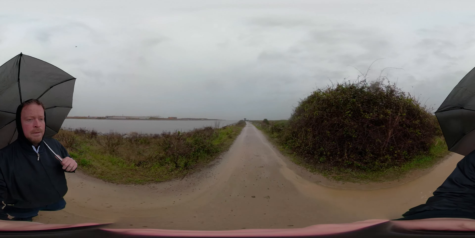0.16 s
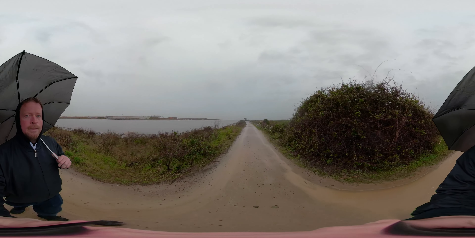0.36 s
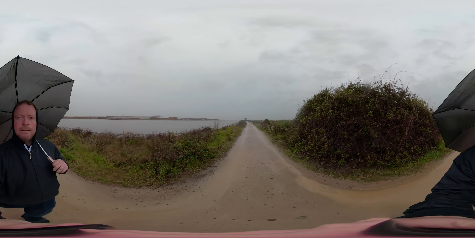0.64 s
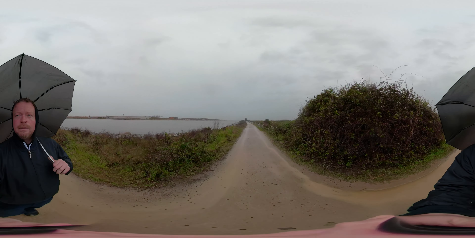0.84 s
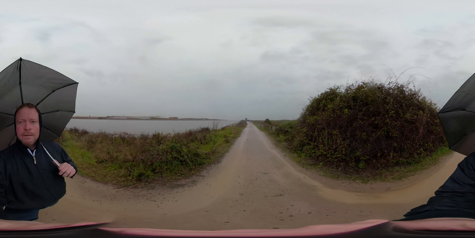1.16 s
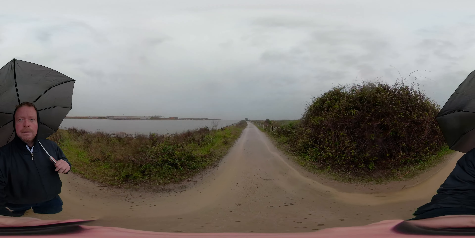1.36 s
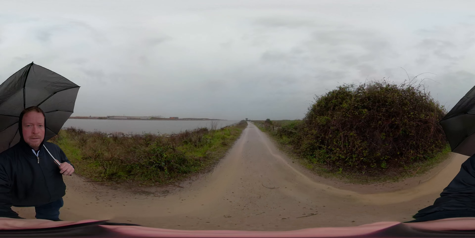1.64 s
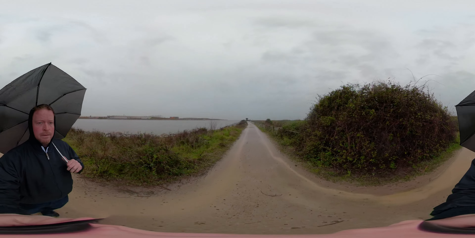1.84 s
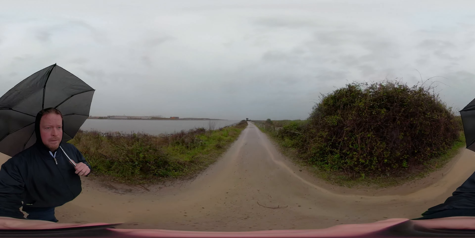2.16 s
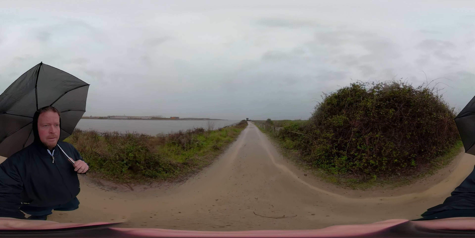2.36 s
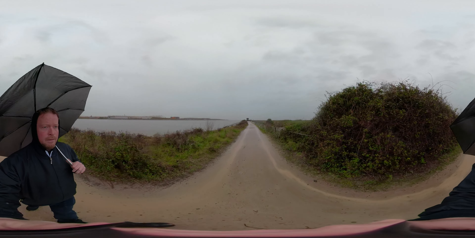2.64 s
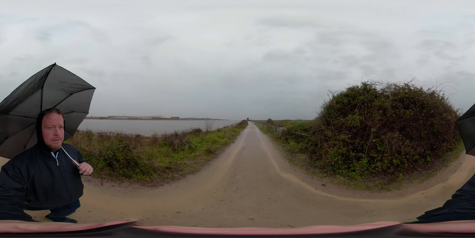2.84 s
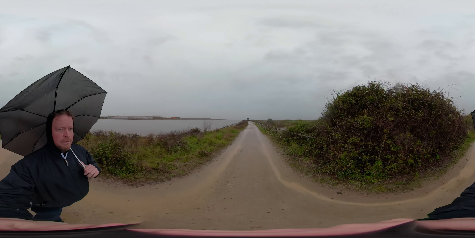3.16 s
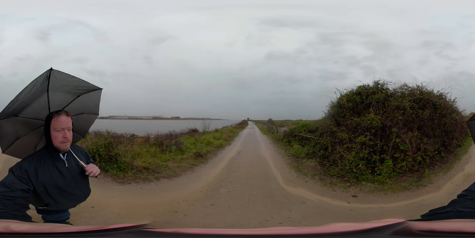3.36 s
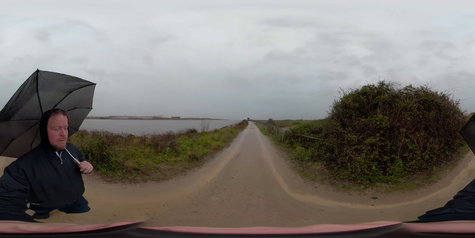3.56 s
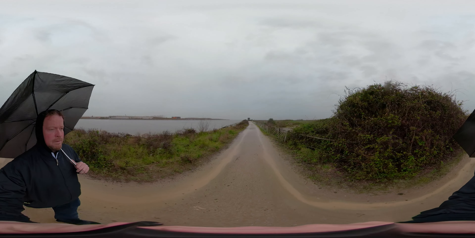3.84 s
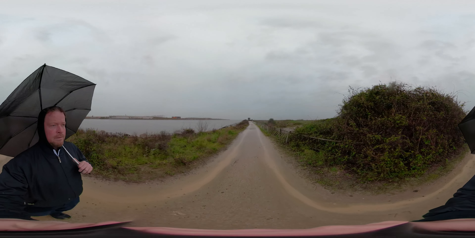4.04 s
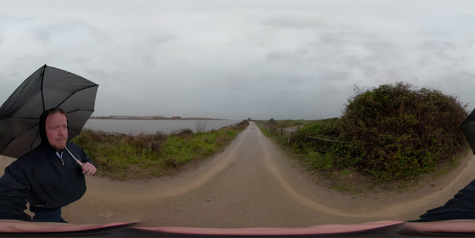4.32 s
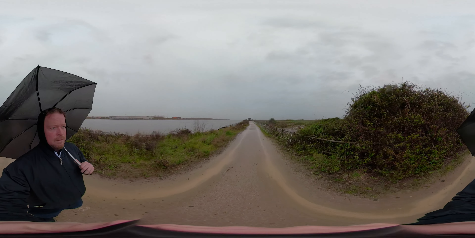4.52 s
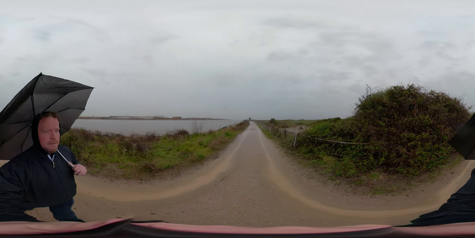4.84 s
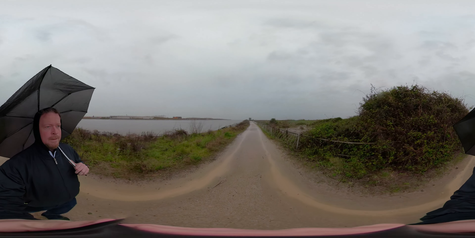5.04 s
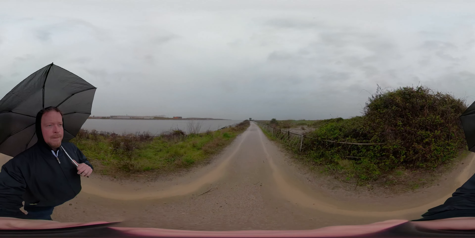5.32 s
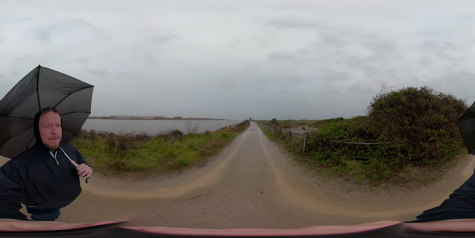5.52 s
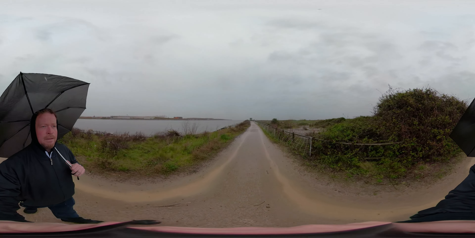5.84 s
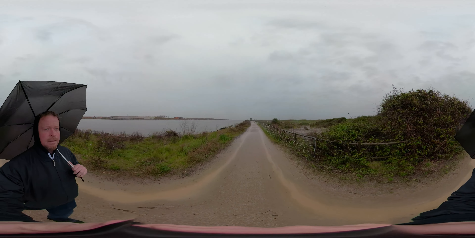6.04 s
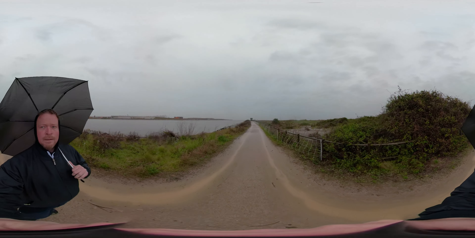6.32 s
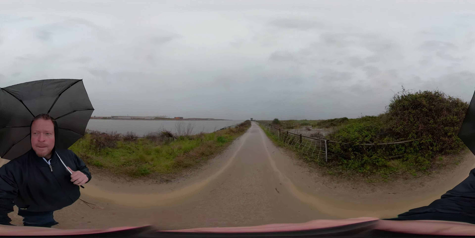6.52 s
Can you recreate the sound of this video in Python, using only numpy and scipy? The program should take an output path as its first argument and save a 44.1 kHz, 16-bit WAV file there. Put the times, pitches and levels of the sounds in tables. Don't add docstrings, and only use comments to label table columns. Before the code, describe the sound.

Open air, a small microphone close beneath an umbrella. From 0 s, dense bright ticks and patter on taut cloth sit over low, uneven wind buffeting, a soft midrange wash of rain on the ground, a hiss of distant drops and a faint fluttering engine hum. One very loud snap hits at 0.5 s with a short low cloth ring. Water laps faintly nearby until about 2.5 s. Boots scuff wet grit quietly roughly every 0.55 s. The shower eases toward 3.2 s, with a strong drop near 3.0, then hardens suddenly at 3.7 s. At 5.15-5.25 s runoff splashes in a quick cluster and a deep, short thump closes the microphone. From 5.4 s treble steadily dulls; muffled knocks and wet cloth crackle, with bursts near 6.1, 6.25, 6.4 and 6.6 s, continue to the 6.7 s end.

```python
import sys
import numpy as np
from scipy import signal
from scipy.fft import rfft, irfft
from scipy.io import wavfile
from scipy.ndimage import uniform_filter1d, minimum_filter1d

SR = 44100
rng = np.random.default_rng(int(sys.argv[2]) if len(sys.argv) > 2 else 0)


def inscribe(sig):
    pcm = np.round(np.clip(np.atleast_2d(sig).T, -1, 1) * 32767)
    wavfile.write(sys.argv[1], SR, pcm.astype(np.int16))


def nominal_scale(level):
    x = np.asarray(level, float) / 20
    return 10 ** x


N = 294588

# (time [s], level [dB])
SHOWER = [(0, 2), (.7, 1.5), (1.4, -1), (2.0, -0.5), (2.6, -3.5), (3.2, -6), (3.7, 2), (4.5, 0.9),
          (5.1, 2.5), (5.8, -2.5), (6.2, 0.8), (6.68, 1.2)]
# (time [s], share covered [0-1])
FILM = [
    (0, 0.02),
    (5.35, 0.02),
    (5.6, 0.52),
    (5.85, 0.76),
    (6.68, 0.87),
]


def evened(x):
    return x / np.sqrt(np.mean(x ** 2) + 1e-20)


def read(points, hz):
    f, value = np.transpose(points)
    return np.interp(np.log(hz + 1), np.log(f + 1), value)


def curve(rows, column=1):
    rows = np.array(rows, float)
    return np.interp(np.arange(N) / SR, rows[:, 0], rows[:, column])


def bump(s, width):
    t = np.arange(N) / SR
    return np.exp(-.5 * ((t - s) / width) ** 2)


def add(mix, s, sound):
    part = mix[round(s * SR):][:len(sound)]
    part += sound[:len(part)]


def causal(db, size=1024):
    log_gain = np.log(nominal_scale(np.concatenate([db, db[-2:0:-1]])))
    return np.fft.ifft(np.exp(np.conj(signal.hilbert(log_gain)))).real[:size]


def noise(points, patchy_db, size):
    hz = np.fft.rfftfreq(size, 1 / SR)
    a, b, patches = rng.standard_normal((4 * N // size + 8, len(hz), 3)).T
    patches = uniform_filter1d(patches, size=8, axis=0)
    patches = evened(uniform_filter1d(patches, size=5, axis=1))
    z = (a + 1j * b) * nominal_scale(read(points, hz)[:, None] + patchy_db * patches)
    return evened(signal.istft(z, nperseg=size, noverlap=3 * size // 4)[1][:N])


def grains(per_s, spread_db):
    size = nominal_scale(spread_db * np.minimum(rng.exponential(1, N), 4))
    sign = rng.choice([-1., 1.], N)
    return evened(size * sign * (rng.random(N) < per_s / SR))


def struck(spikes, click):
    return signal.oaconvolve(spikes, click / np.linalg.norm(click))[:N]


def clicks(split_hz=4300):
    # (frequency [Hz], level [dB])
    port = [(300, -3.5), (800, -3), (2600, -4), (4200, -7.5), (5400, 1.5), (6300, -1), (7400, -3),
            (8500, -20), (10500, -28), (12400, -27), (13300, -43), (15000, -42), (16500, -52.5)]
    click = causal(read(port, np.fft.rfftfreq(4096, 1 / SR)))
    low = 1 / (1 + (np.fft.rfftfreq(len(click), 1 / SR) / split_hz) ** 8)
    late = rfft(np.roll(click, 64))
    knock, snap = irfft(late * low), irfft(late * (1 - low))
    return click, snap / abs(signal.hilbert(snap)).max(), knock / abs(signal.hilbert(knock)).max()


def wind():
    # (time [s], level [dB])
    gusts = [(0, -37.5), (.3, -48), (.9, -42.5), (1.5, -43.5), (2.1, -46.5), (2.4, -45), (2.7, -45),
             (3, -42), (3.5, -48.5), (3.9, -42.5), (4.3, -50), (5.1, -44.5), (5.6, -48), (5.95, -42.5),
             (6.3, -41.5), (6.68, -44)]
    # (frequency [Hz], level [dB per Hz])
    buffet_colour = [(10, -17), (22, -1), (50, 7), (66, 6.5), (100, -0.5), (160, -52.5), (300, -101.5)]
    # (frequency [Hz], level [dB per Hz])
    roar_colour = [(30, -66), (60, -7), (90, -2), (130, -4.5), (200, -11.5), (350, -20.5), (600, -27.5),
                   (1200, -53.5), (2500, -99)]
    gust_db = curve(gusts)
    buffet = nominal_scale(gust_db) * noise(buffet_colour, patchy_db=0.5, size=8192)
    swell_db = 1.1 * bump(1.33, width=0.44) + 3 * curve(FILM)
    roar_db = -49.5 + 0.27 * (gust_db - gust_db.mean()) + swell_db
    return buffet + nominal_scale(roar_db) * noise(roar_colour, patchy_db=1.5, size=2048)


def wash():
    # (frequency [Hz], level [dB per Hz])
    wash_colour = [(100, -57.5), (300, -2.5), (550, 1.5), (860, 5), (1200, -2.5), (1700, -5.5),
                   (2400, -19.5), (4000, -37), (8000, -72)]
    wash_db = -59.5 + 0.23 * curve(SHOWER) + curve(FILM)
    return nominal_scale(wash_db) * noise(wash_colour, patchy_db=2.5, size=512)


def lapping():
    # (time [s], level [dB])
    bank = [
        (0, -63),
        (.8, -60.5),
        (1.6, -67),
        (2.4, -66),
        (2.9, -72.5),
        (6.68, -78),
    ]
    # (frequency [Hz], level [dB per Hz])
    lap_colour = [(600, -56), (1050, -1), (1400, -1), (1700, -8.5), (2600, -57)]
    return nominal_scale(curve(bank)) * noise(lap_colour, patchy_db=1.2, size=512)


def drone():
    # (time [s], frequency [Hz], level [dB])
    engine = [(0, 74.8, -40), (.3, 74.5, -45), (.6, 75.4, -51), (1.2, 75.77, -55), (1.65, 74.2, -44),
              (1.85, 76.5, -47.5), (2.1, 75.4, -42), (2.4, 74.6, -40), (3.1, 75.84, -49),
              (3.5, 77.2, -44.5), (4.2, 78.8, -41.5), (4.65, 78.17, -41), (5.1, 77.95, -39),
              (5.55, 78, -51), (5.72, 76.85, -38), (5.9, 75.8, -51.5), (6.3, 76.9, -46), (6.68, 76.4, -44)]
    flutter = uniform_filter1d(rng.standard_normal((2, N)), size=2500)
    flutter = evened(uniform_filter1d(flutter, size=2500))
    turns = np.cumsum(curve(engine, column=1)) / SR
    tone = np.sin(2 * np.pi * turns + 1.16 * flutter[1])
    return nominal_scale(curve(engine, column=2)) * np.sqrt(2) * (0.8 + 0.25 * flutter[0]) * tone


def patter_level():
    return -70.5 + 0.1 * curve(SHOWER) + 0.51 * np.arange(N) / SR


def patter():
    out = np.zeros(N)
    for click, share_db in zip(clicks(), (-3.5, -8.5, -7.5)):
        out += nominal_scale(share_db) * struck(nominal_scale(patter_level()) * grains(200, spread_db=3.5), click)
    return out


def far_drops():
    # (frequency [Hz], level [dB per Hz])
    far_colour = [(500, -45), (1500, -7.5), (2400, -5), (2900, -3.5), (3600, -9), (4500, -9.5), (5000, -4),
                  (5600, 3), (6400, -5.5), (7300, -5.5), (8700, -24), (12500, -28.5), (13000, -66),
                  (16000, -63)]
    flicker_db = 2.2 * evened(uniform_filter1d(rng.standard_normal(N), size=200))
    return nominal_scale(patter_level() - 1.5 + flicker_db) * noise(far_colour, patchy_db=4.0, size=256)


def spray():
    # (frequency [Hz], level [dB])
    airy_top = [(6000, -41), (8500, -1), (10500, 4), (12500, -3), (13500, -11), (15000, -20), (16500, -55)]
    tick = causal(read(airy_top, np.fft.rfftfreq(4096, 1 / SR)))
    return nominal_scale(-88.5 + curve(SHOWER)) * struck(grains(22, spread_db=5.0), tick)


def middling(count=230):
    place, size, colour = rng.random((count, 3)).T
    s = .02 + (np.arange(count) + 3 * place) / (count + 3) * (N / SR - .04)
    over_db = 2 * np.minimum(-np.log(size + 1e-9), 3)
    knock_db = -3 - 1.33 * over_db + 3.5 * 3.5 * (colour - .5)
    snap_db = -49 + over_db + np.interp(s, *np.transpose(SHOWER))
    return list(zip(s, snap_db, knock_db))


def drops():
    # (time [s], snap peak [dB],
    # knock against the snap [dB])
    heavy = [(.1144, -35, -3), (.122, -47, 4), (.1933, -37, -8), (.5023, -18, -8.5), (.7748, -41.5, -3),
             (.8511, -37, -5.5), (.8931, -35, -11), (.003, -43, 1), (1.1444, -44.5, -2.5),
             (1.2963, -41, 2.5), (1.382, -37.5, 1.5), (1.4298, -41, -0.5), (1.5181, -40, -5),
             (1.5593, -34.5, -11), (1.7462, -44.5, -7), (1.8678, -30.5, -9), (2.9651, -41.5, -9),
             (2.9999, -40.5, -5), (3.0278, -26.5, -11), (3.1212, -40, -4), (3.4816, -41, -9),
             (3.5283, -35.5, -3), (3.8251, -38.5, -5.5), (3.9136, -42.5, 0), (4.1643, -42, -7),
             (4.5227, -42.5, -2.5), (4.7521, -40, -3.5), (.5071, -40, -12), (4.9639, -36.5, -7),
             (5.0136, -39.5, -7),
             (5.1511, -43.5, -1.5), (5.1575, -31, -9.5), (5.1775, -36, -10), (5.2018, -32, -9.5),
              (5.2203, -55, -4), (5.2432, -44, -2), (5.2498, -46, 3), (5.4673, -39.5, -2),
              (5.5693, -40, -10), (5.6091, -35.5, -9), (5.6836, -41, 1), (5.7661, -44, 0), (6.0861, -45, 3),
              (6.1379, -43.5, 6), (6.2376, -36, -8), (6.2528, -42.5, -0.5), (6.4277, -47, 10.5),
              (6.5667, -41.5, 0.5), (6.6164, -32.5, -3.5)]
    _, snap, knock = clicks()
    t, bright, dull = np.arange(300) / SR, np.zeros(N), np.zeros(N)
    rows = heavy + middling()
    chance = rng.standard_normal((len(rows), 3, len(t)))
    for (s, snap_db, knock_db), (a, b, c) in zip(rows, chance):
        splash = (abs(c) > 1.9) * nominal_scale(-14 - 60 * t / .007 + 3 * np.clip(c[0], -2, 1))
        uneven = np.interp(snap_db, (-44, -30), (.16, .06))
        splash = splash + uneven * (t > 0) * np.exp(-t / .0003)
        start = s - 76 / SR
        add(bright, start, nominal_scale(snap_db) * ((t == 0) + a * splash))
        add(dull, start, nominal_scale(snap_db + knock_db) * ((t == 0) + b * splash))
    snaps = nominal_scale(0.7) * signal.oaconvolve(bright, snap)[:N]
    return snaps + nominal_scale(5.5) * signal.oaconvolve(dull, knock)[:N]


def rings():
    # (time [s], level [dB], frequency [Hz],
    # time to fade by 60 dB [s])
    panels = [(.5025, -30.5, 190, 0.029), (2.8158, -40, 1913, 0.0073), (3.9195, -38, 1793, 0.0065),
              (.0367, -42, 2340, 0.0054), (3.4052, -46.5, 2680, 0.0096), (3.5415, -45, 2500, 0.0054),
              (4.2502, -36.5, 1590, 0.0038), (5.222, -36.5, 1310, 0.0057), (5.7576, -37.5, 1213, 0.0054),
              (6.2528, -30, 1120, 0.0041), (6.6162, -32, 752, 0.013)]
    t, out = np.arange(2000) / SR, np.zeros(N)
    for s, db, hz, t60 in panels:
        add(out, s, nominal_scale(db - 60 * t / t60) * np.sin(2 * np.pi * hz * t))
    return out


def footsteps():
    # (time [s], level [dB], length [s])
    boots = [(0.095, -57.5, 0.029), (0.634, -63, 0.048), (1.194, -58.5, 0.038), (1.708, -58.5, 0.016),
             (2.297, -68, 0.07), (2.816, -56.5, 0.032), (3.41, -60, 0.049), (3.914, -64.5, 0.042),
             (4.547, -69, 0.067), (5.156, -87, .04), (5.525, -65, .04), (6.108, -68, 0.043),
             (6.605, -59.5, 0.046)]
    tread = sum(nominal_scale(db) * bump(s, length) for s, db, length in boots)
    out = np.zeros(N)
    for click, share_db in zip(clicks(), (-3.5, -8.5, -7.5)):
        out += nominal_scale(share_db) * struck(tread * grains(1200, spread_db=5.5), click)
    return out


def wet_cloth():
    # (time [s], level [dB], length [s])
    shakes = [
        (6.09, 4.5, .06),
        (6.24, 3, .03),
        (6.43, 6.5, 0.037),
        (6.621, 4, .07),
    ]
    _, _, knock = clicks()
    shake_db = sum(db * bump(s, length) for s, db, length in shakes)
    level = nominal_scale(-65.5 + shake_db + curve(SHOWER)) * curve(FILM)
    return struck(level * grains(900, spread_db=6.5), knock)


def thump():
    s, peak_db, swell_s = 5.2222, -20, .0045
    t, out = np.arange(1, 2500) / SR, np.zeros(N)
    turns = .57 * np.log(t / .0006 + .1)
    swell = (t / swell_s * np.exp(1 - t / swell_s)) ** 2.4
    add(out, s, nominal_scale(peak_db) * swell * np.cos(2 * np.pi * turns))
    return out


def scene():
    air = wind() + wash() + lapping() + drone()
    rain = patter() + far_drops() + spray() + drops() + rings()
    return (air + rain + footsteps() + wet_cloth() + thump())[None]


def top_cut(x):
    return signal.sosfilt(signal.butter(12, 16000, fs=SR, output="sos"), x)


def record(dry):
    # (frequency [Hz], level [dB])
    film_tone = [(400, 2.5), (850, -2), (1300, 2), (2000, 1), (3000, 1), (3700, 0.5), (4600, -11),
                 (5600, -16), (7000, -24.5), (8700, -23.5), (10500, -17), (12300, 3), (16000, -21)]
    hiss_colour = [(9000, -40), (11300, -14), (12200, 0), (12700, -2), (13000, -40)]  # (Hz, dB per Hz)
    hiss = nominal_scale(-97) * noise(hiss_colour, patchy_db=2, size=512)
    hz, t, z = signal.stft(dry + hiss, SR, nperseg=512, boundary="even")
    film = np.clip(np.interp(t, *np.transpose(FILM)), 0, 1.5)
    z = z * nominal_scale(read(film_tone, hz)[:, None] * film)

    top = hz > 8700
    top_power = (abs(z[0, top]) ** 2).mean(axis=0)
    top_db = 10 * np.log10(uniform_filter1d(top_power, size=2) + 1e-20)
    loudest_near_db = -minimum_filter1d(-top_db, size=9)
    beside_click = loudest_near_db - top_db > 11
    quiet = uniform_filter1d(top_db, size=4) < np.interp(film, (0, 1), (-125, -115))
    chance = uniform_filter1d(rng.standard_normal(len(t)), size=4) * 2 > 1.7 - 1.9 * film
    faint = beside_click | quiet | chance
    left_over = np.interp(film, (0, 1), (.35, .12))
    z = z * np.where(top[:, None] & faint, left_over, 1)
    wet = signal.istft(z, SR, nperseg=512)[1][:, :N]
    soft_end = np.sin(np.pi / 2 * np.clip((N - np.arange(N)) / 300, 0, 1)) ** 2
    return top_cut(wet * soft_end)


dry = scene()
out = record(dry)
inscribe(out)
```